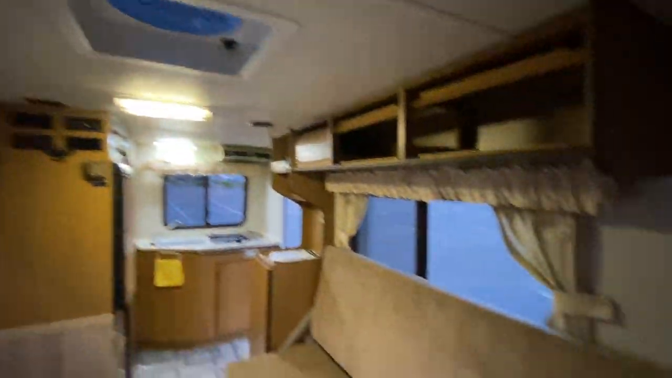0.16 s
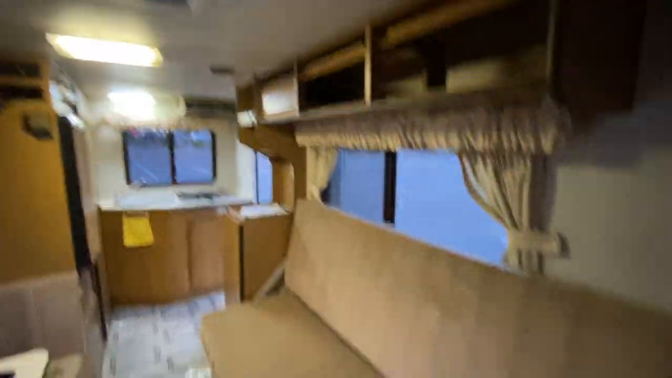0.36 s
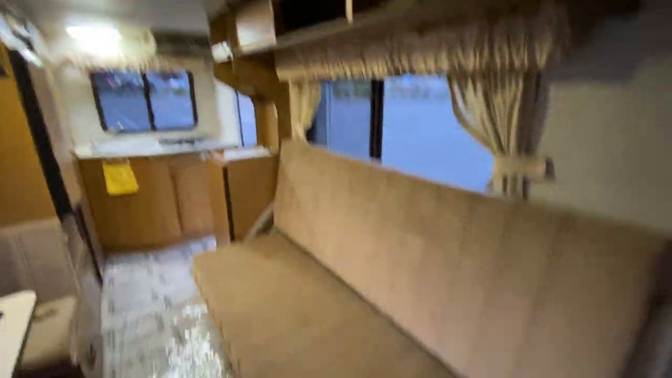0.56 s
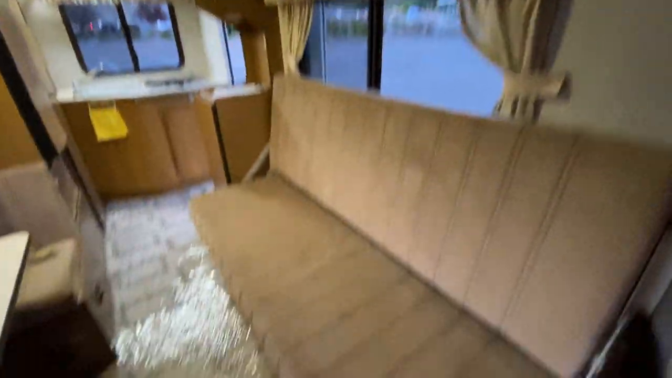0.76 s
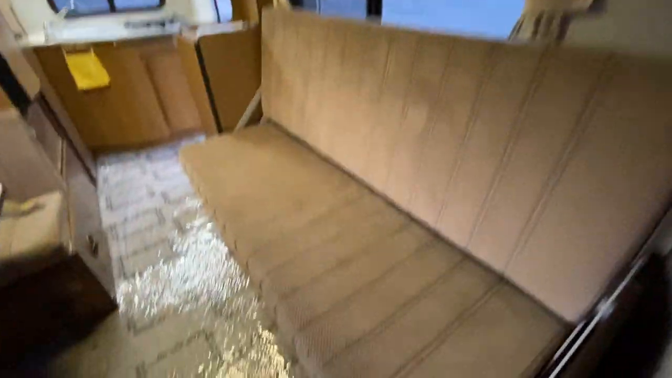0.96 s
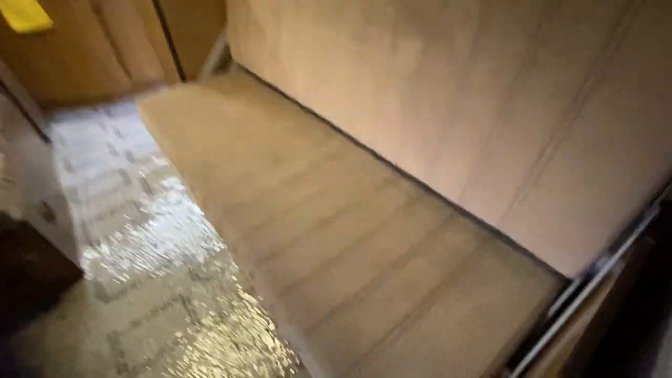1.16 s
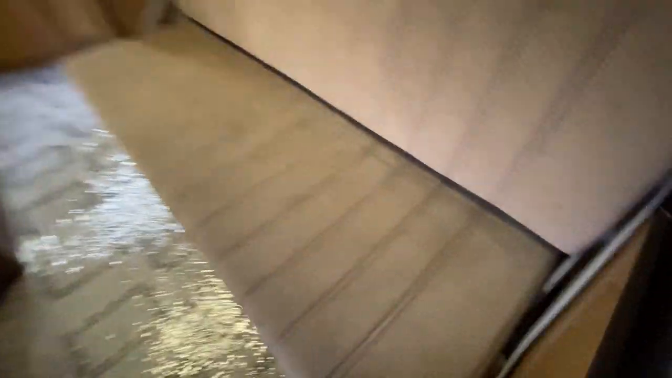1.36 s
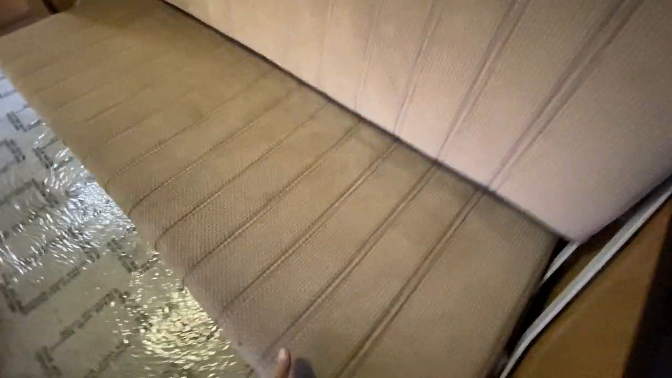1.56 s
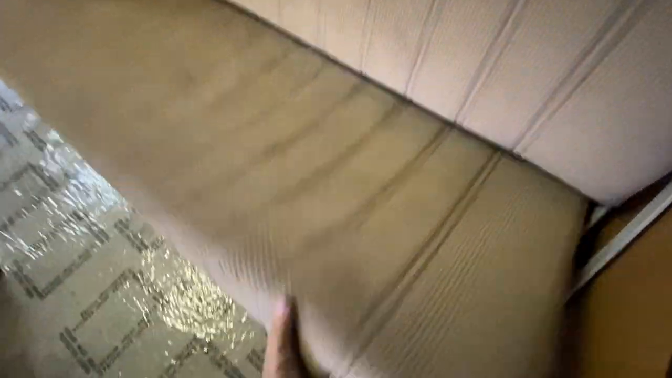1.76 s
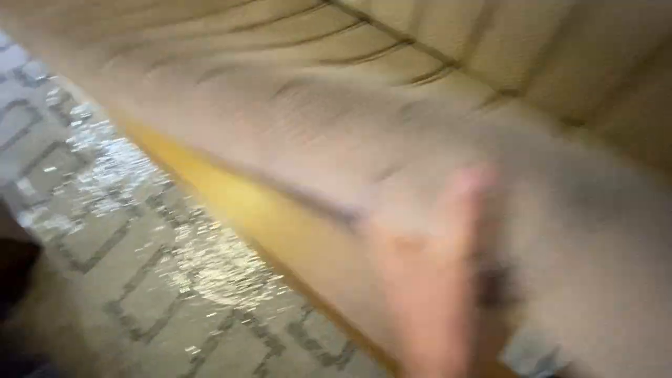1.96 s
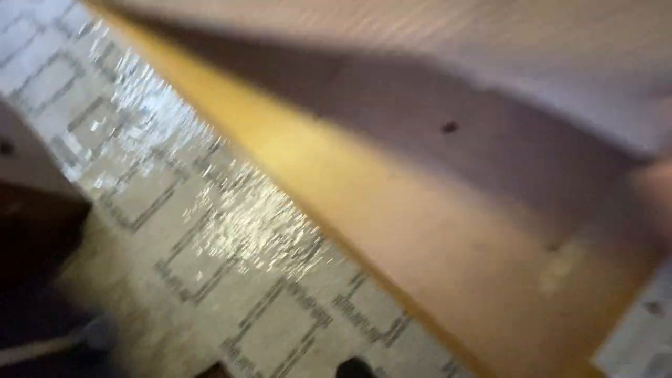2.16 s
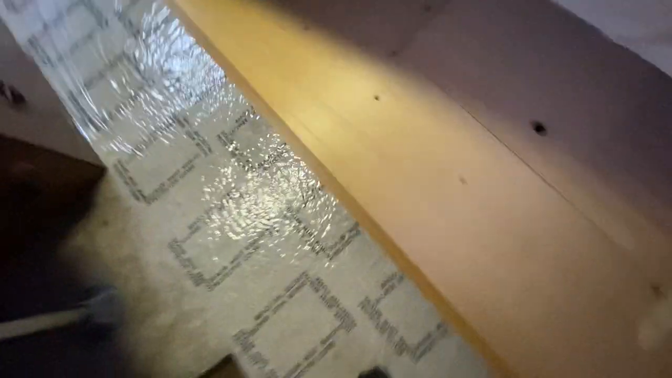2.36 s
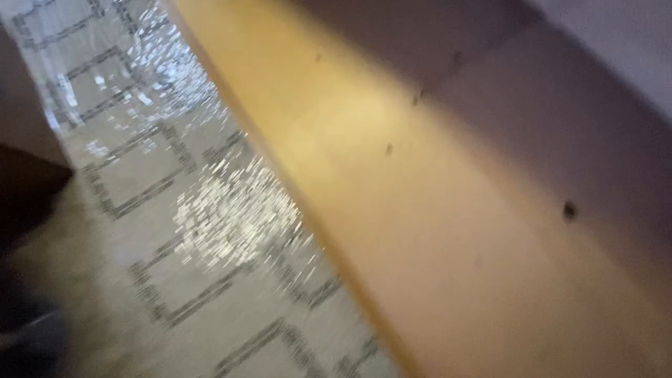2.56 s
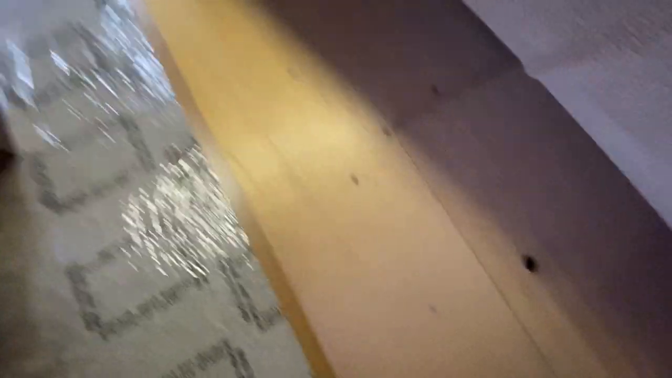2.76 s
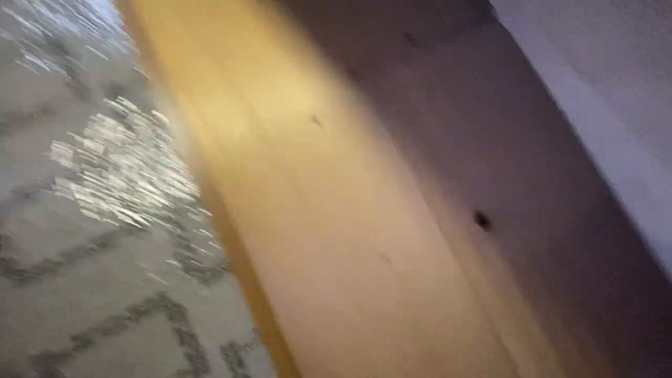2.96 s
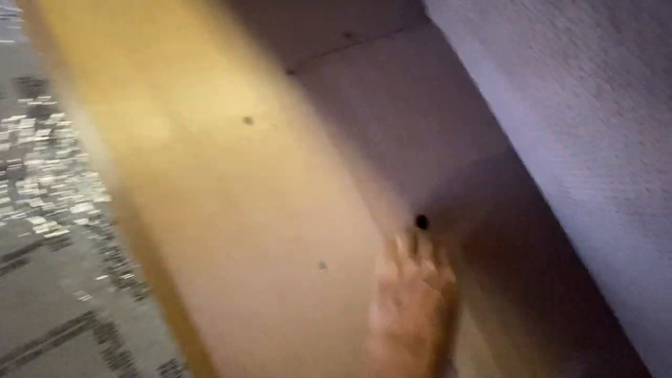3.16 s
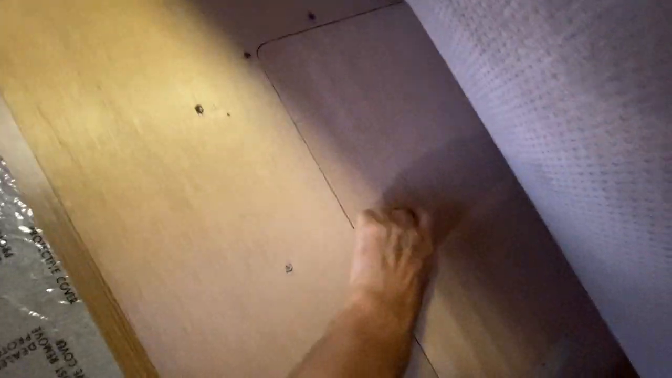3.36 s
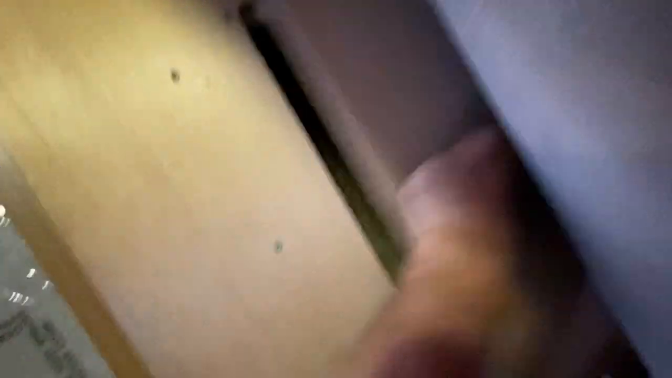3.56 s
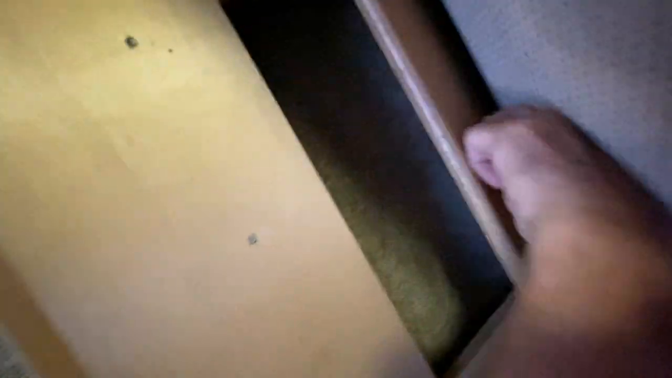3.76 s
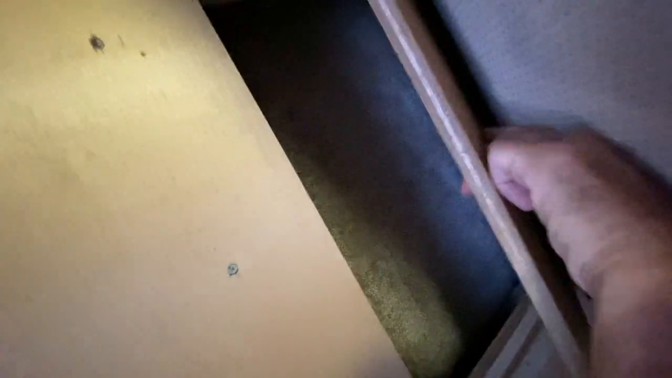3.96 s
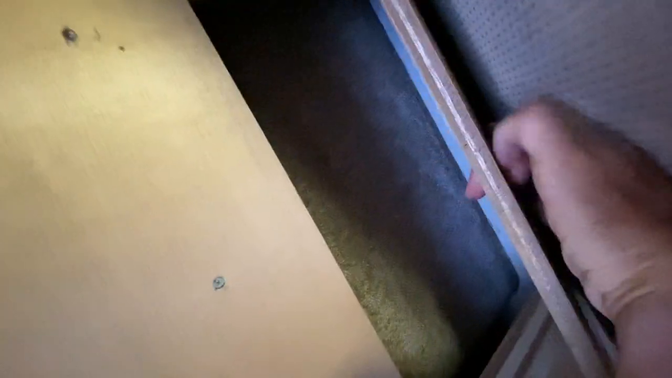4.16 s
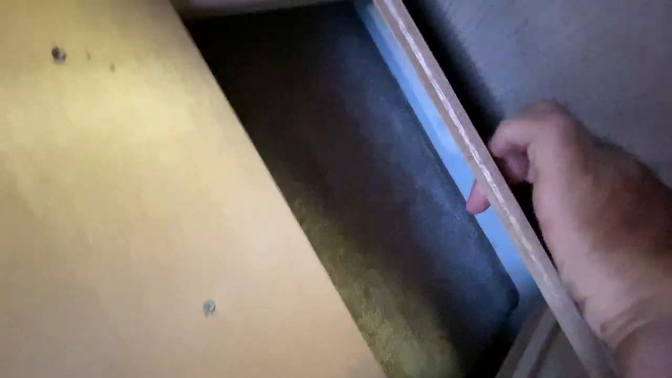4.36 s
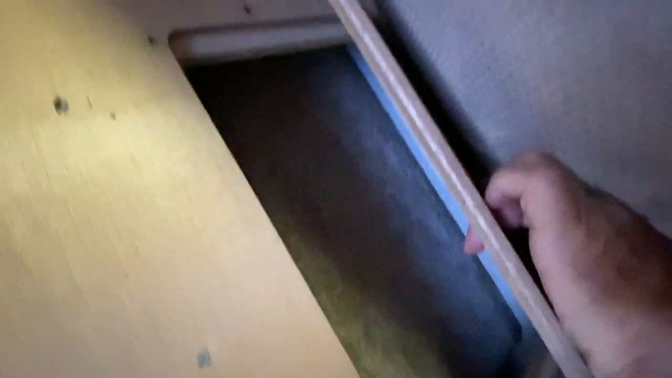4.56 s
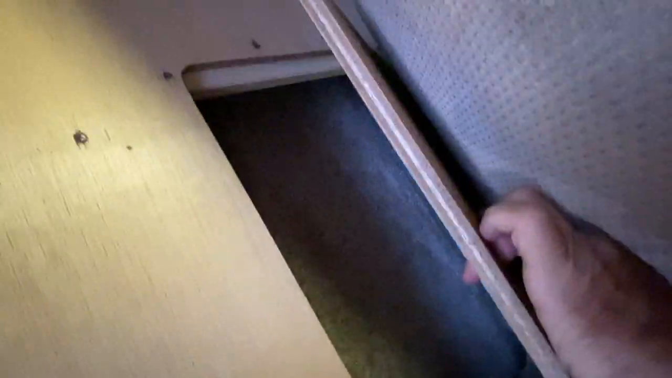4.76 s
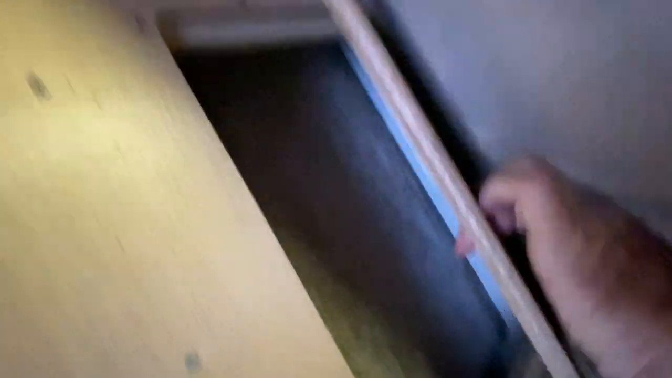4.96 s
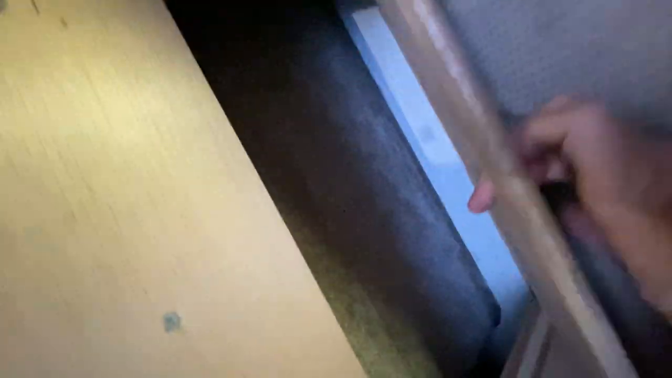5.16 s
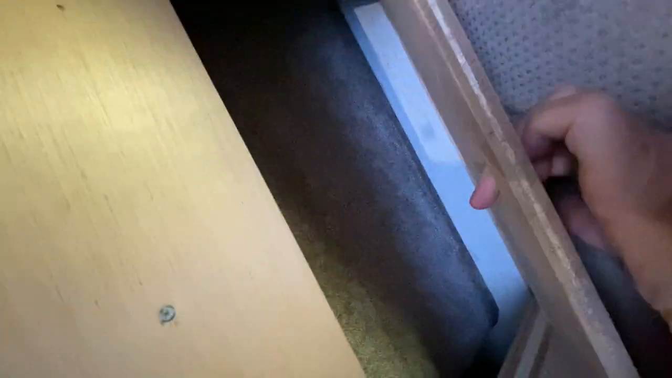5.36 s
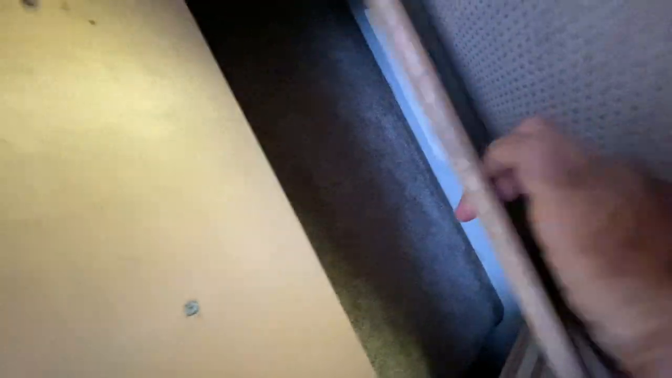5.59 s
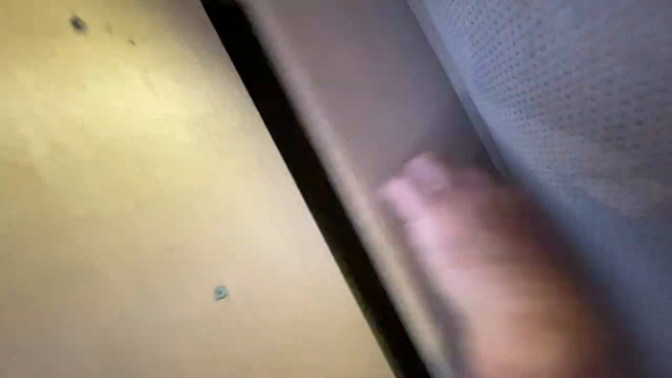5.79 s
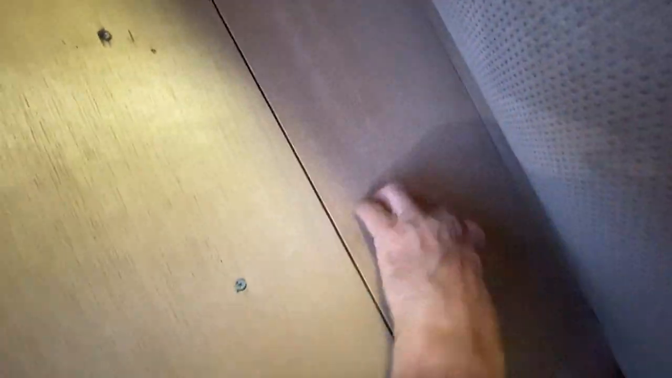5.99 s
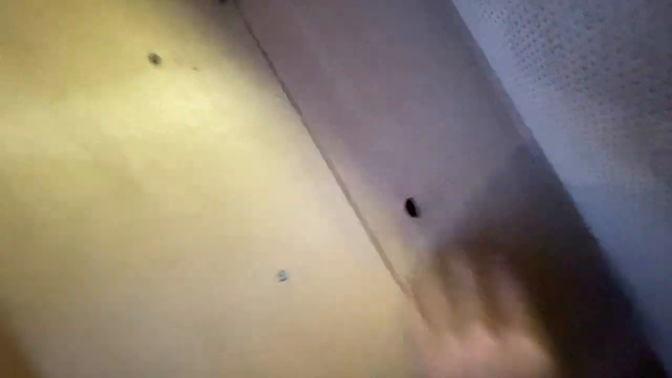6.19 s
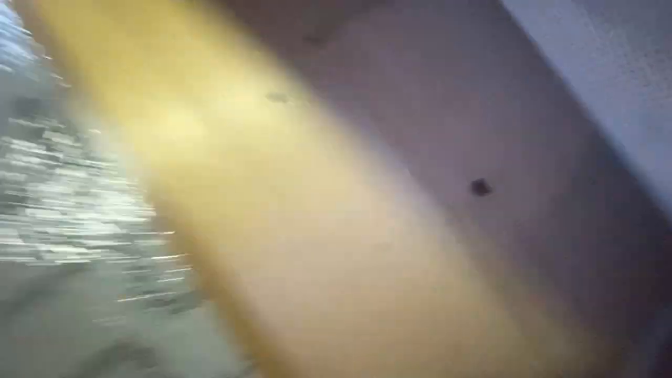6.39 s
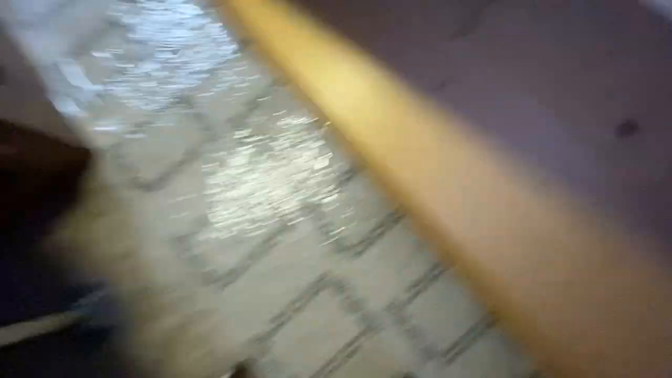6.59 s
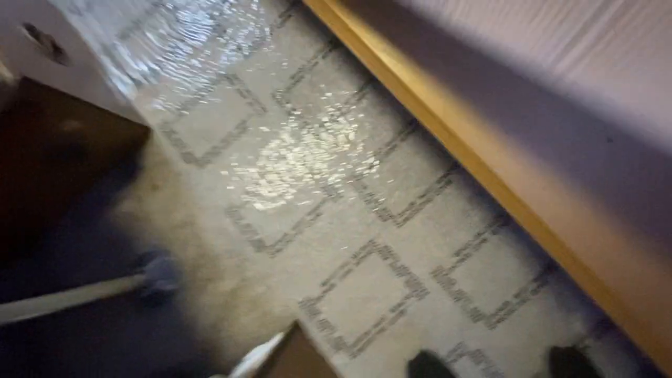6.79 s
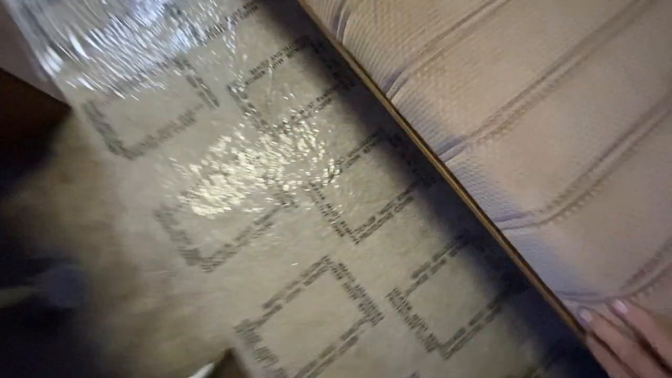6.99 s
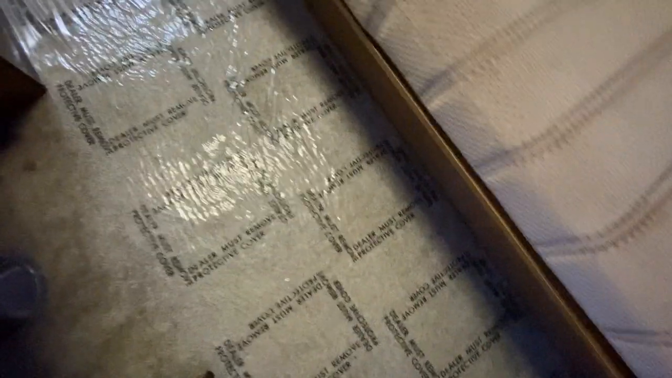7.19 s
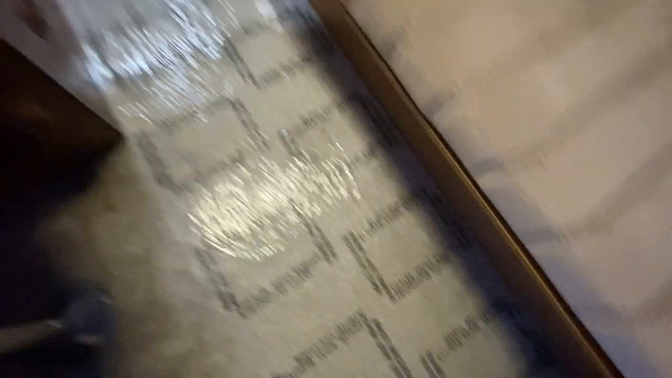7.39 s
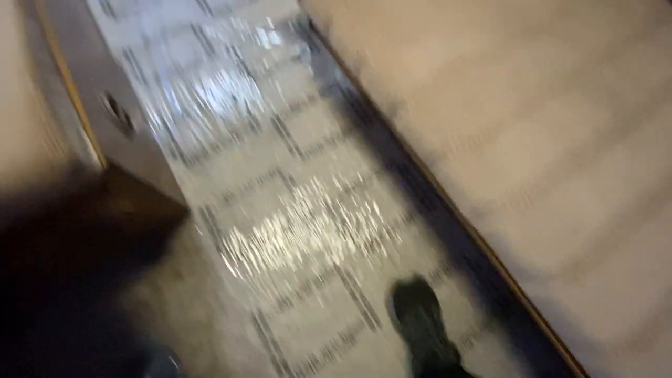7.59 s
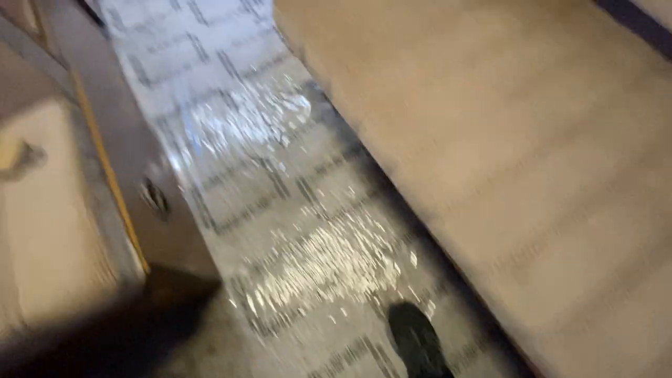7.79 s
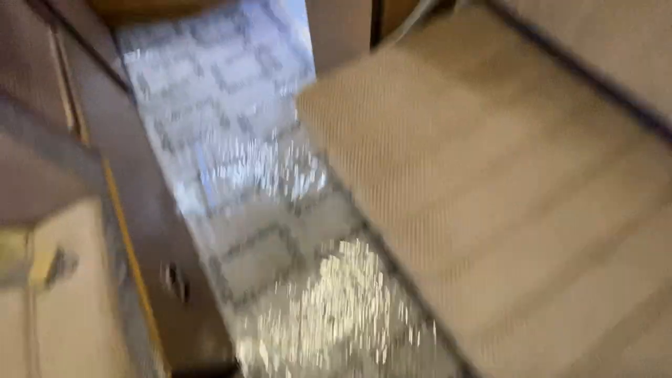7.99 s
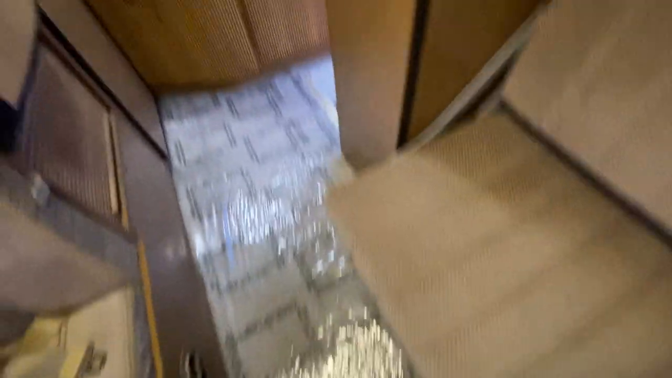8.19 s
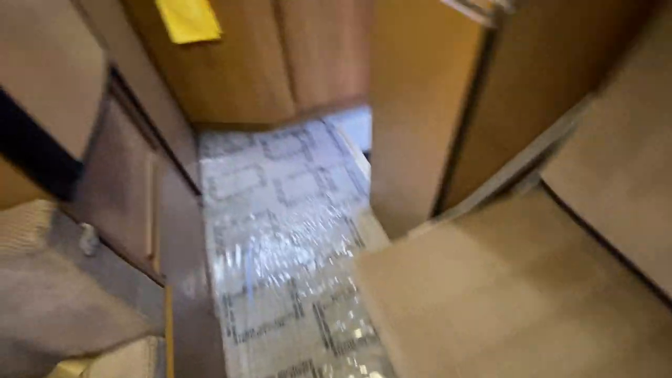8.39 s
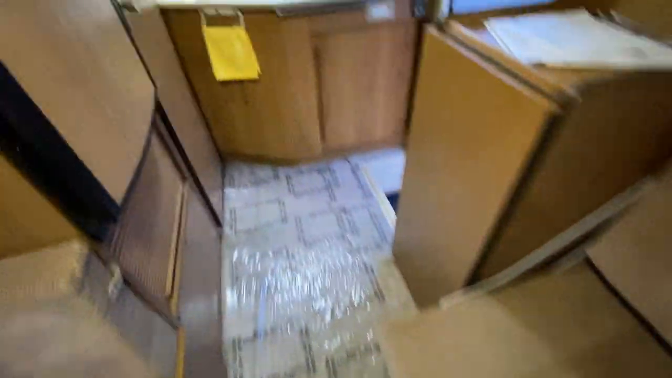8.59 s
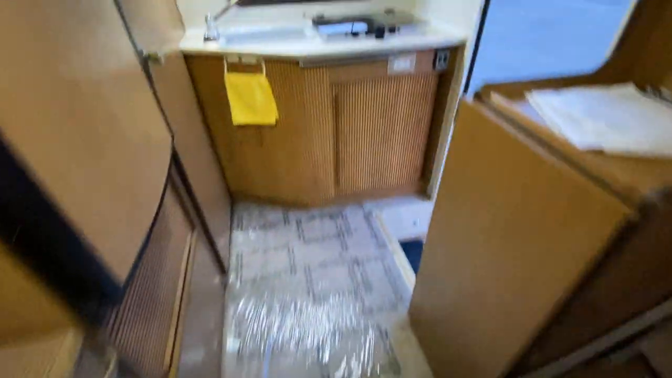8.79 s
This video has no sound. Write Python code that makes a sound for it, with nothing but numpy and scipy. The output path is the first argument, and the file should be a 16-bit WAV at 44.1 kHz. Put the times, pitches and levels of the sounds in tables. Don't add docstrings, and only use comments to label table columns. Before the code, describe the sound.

Close handheld stereo pickup inside a small camper with low outside rumble. A seat cushion is tugged with sharp, raspy fabric scrapes and board knocks, then clothing rustles. A hand lands on wood and jerks a lid free with a cluster of hollow thumps. It is held open with tiny dry creaks, then drops with a loud bouncing slam, followed by soft footfalls and rustling.

```python
import sys
import numpy as np
from scipy import signal
from scipy.fft import rfft, irfft, next_fast_len
from scipy.io import wavfile
from scipy.ndimage import uniform_filter1d

SR = 44100
rng = np.random.default_rng(int(sys.argv[2]) if len(sys.argv) > 2 else 0)


def volts(x):
    e = np.asarray(x, float) / 20
    return 10 ** e


def wav_out(sig):
    wavfile.write(sys.argv[1], SR, np.round(np.clip(np.atleast_2d(sig).T, -1, 1) * 32767).astype(np.int16))


N = 389844


def evened(x):
    return x / np.sqrt(np.mean(x ** 2) + 1e-20)


def read(points, hz):
    f, value = np.transpose(points)
    return np.interp(np.log(hz + 1), np.log(f + 1), value)


def colour(x, points):
    size = x.shape[-1]
    gain = volts(read(points, np.fft.rfftfreq(size, 1 / SR)))
    return evened(irfft(rfft(x) * gain, size))


def curve(tables, column=1):
    rows = np.concatenate(tables)
    return np.interp(np.arange(N) / SR, rows[:, 0], rows[:, column])


def add(mix, s, sound):
    part = mix[round(s * SR):][:len(sound)]
    part += sound[:len(part)]


def wobble(size):
    return evened(uniform_filter1d(uniform_filter1d(rng.standard_normal(N), size), size))


def resonated(x, hz, width_hz):
    band = signal.iirpeak(hz, hz / width_hz, SR)
    return evened(signal.lfilter(*band, signal.lfilter(*band, x)))


def fibres(per_s, spread_db, channels=3):
    size = volts(spread_db * np.minimum(rng.exponential(1, N), 5)) * (rng.random(N) < per_s / SR)
    return size * rng.standard_normal((channels, N))


# time_s, level_db
TRAFFIC = [(0.0, -49), (0.69, -52), (0.93, -46.5), (1.4, -52), (2.2, -41.5), (2.9, -48.5), (4.2, -46.5),
           (4.9, -48.5), (5.19, -47), (5.46, -46.5), (6.72, -43.5), (7.19, -46), (7.83, -47.5),
           (8.84, -48.5)]


def unrest():
    power, t = volts(2 * curve([TRAFFIC])), np.arange(SR) / SR
    shake_db, rise_s, t60_s = -17, 0.017, 0.65
    for s, peak_db, *_ in struck():
        add(power, s, (1 - np.exp(-t / rise_s)) * volts(2 * (peak_db + shake_db - 60 * t / t60_s)))
    return np.sqrt(power)


# pitch_hz, level_db (per Hz)
RUMBLE = [(13, -56.5), (22, -9), (45, -3), (72, 5), (85, -2), (103, -1.5), (177, -10), (221, -15.5),
          (258, -19), (400, -41.5), (520, -77.5), (880, -120)]
# pitch_hz, level_db (per Hz)
AIR = [(88, -39), (150, -1.5), (349, -10.5), (810, -7), (1010, -14.5), (1310, -13), (2530, -34.5),
       (4630, -38.5), (10200, -45), (12000, -59), (15600, -74.5), (22000, -120)]


def background():
    drone = signal.lfilter(*signal.iirpeak(72, 7, SR), rng.standard_normal((3, N)))
    rumble = colour(rng.standard_normal((3, N)), RUMBLE) + volts(-3.5) * colour(drone, RUMBLE)
    rumble = evened(rumble * volts(0.7 * wobble(size=2500)))
    air = colour(rng.standard_normal((3, N)), AIR) * volts(1.6 * wobble(size=4000))
    return unrest() * rumble + volts(-56.5) * air


# time_s, level_db
STIR = [(0.0, -116), (0.27, -80), (0.78, -86), (0.92, -64), (1.03, -72), (1.15, -65), (1.51, -65.5),
        (1.62, -59), (1.88, -55), (2.43, -51.5), (2.71, -65), (3.66, -60.5), (3.8, -66), (4.65, -80),
        (5.43, -105), (5.8, -67), (6.24, -70.5), (8.84, -72)]
# start_s, grip_s, pull_s, first_level_db, last_level_db
DRAGS = [
    (0.926, .004, 0.013, -49.5, -49.5),
    (1.681, 0.029, 0.07, -26, -27),
    (1.929, 0.04, 0.08, -39.5, -34),
    (2.139, 0.0043, 0.051, -38, -41.5),
    (2.257, 0.0075, 0.11, -45.5, -30.5),
    (3.466, 0.0059, 0.053, -53.5, -50),
]
# peak_s, rise_s, fall_s, level_db, dullness_db
RUSTLES = [(0.458, 0.21, 0.45, -67, -2), (2.15, .012, 0.092, -39.5, 8), (2.262, .005, 0.05, -40.5, 0),
           (2.78, 0.037, 0.23, -59.5, 3), (2.92, 0.19, 0.25, -53.5, -7.5), (3.2, 0.13, 0.63, -55.5, -4),
           (5.13, 0.22, 0.15, -69.5, 3), (5.645, 0.15, 0.1, -60.5, 1.5), (5.87, 0.048, 0.16, -66, 20),
           (6.16, .11, 0.09, -52, -9.5), (6.45, 0.16, 0.3, -58.5, 4), (6.7, 0.43, 0.5, -56, -1),
           (6.97, 0.19, 0.13, -53, 1), (7.3, 1, 0.2, -63.5, -6.5), (7.36, 0.095, 0.75, -59, -1),
           (7.74, 0.16, 0.64, -56.5, -2.5), (8.5, 0.11, 1, -60, -0.5)]


def rubbing():
    grip_db, let_go_db_per_s = -22.5, 401.5
    edge_db = -20.5
    t, power, dull = np.arange(N) / SR, volts(2 * curve([STIR])), np.zeros(N)
    for s, grip, pull, first_db, last_db in DRAGS:
        db = np.interp(t - s, [0, grip, grip + pull], [first_db + grip_db, first_db, last_db], left=-200)
        power = power + volts(2 * (db - let_go_db_per_s * np.maximum(t - s - grip - pull, 0)))
    for s, rise, fall, db, dull_db in RUSTLES:
        one = volts(2 * (db + edge_db * np.maximum((s - t) / rise, (t - s) / fall)))
        power, dull = power + one, dull + dull_db * one
    return 10 * np.log10(power), dull / power


def patchy(x, patch_db):
    z = signal.stft(x, nperseg=256)[2]
    patches = rng.standard_normal(z.shape[:0:-1]).T
    patches = evened(uniform_filter1d(uniform_filter1d(patches, size=7, axis=0), size=14, axis=1))
    return signal.istft(z * volts(patch_db * patches), nperseg=256)[1][:, :N]


# pitch_hz, level_db (per Hz)
FIZZ = [(2500, -11.5), (4100, -3), (5200, -2), (6600, -4), (8200, -3.5), (12000, -10.5), (15500, -20),
        (16500, -12.5)]
# pitch_hz, level_db (per Hz)
RASP = [(1000, -42), (1700, 0), (2700, -2), (4000, -9.5), (6000, -20.5)]
# pitch_hz, level_db (per Hz)
SCRAPE = [(70, -48), (130, -0.5), (300, 1), (600, -3), (1000, -3), (1600, -9.5), (2600, -53.5)]


def cloth():
    rub_db, dull_db = rubbing()
    body_db = -3 + dull_db - 0.27 * (rub_db + 35)
    rasp_db = -5.5 + dull_db - 0.18 * (rub_db + 35)
    force = np.clip((rub_db + 65) / 30, .35, 1)
    clumps = volts(force * (1.6 * wobble(size=120) + .9 * wobble(size=900)))
    fizz = volts(rub_db + .8) * colour(fibres(7000, 2.4), FIZZ)
    rasp = volts(rub_db + np.minimum(rasp_db, 9.5) + 2.0) * colour(fibres(5000, 1.0), RASP)
    scrape = volts(rub_db + np.minimum(body_db, 16.5) + 3.0) * colour(fibres(4000, 1.8), SCRAPE)
    weave_hz, width_hz = 6400, 1200
    weave = signal.lfilter(*signal.iirpeak(weave_hz, weave_hz / width_hz, SR), fibres(5500, 2.2))
    weave = volts(rub_db + 0.5 + 0.34 * (rub_db + 23.5)) * evened(weave)
    return patchy(clumps * (fizz + rasp + scrape + weave), 1.9)


# pitch_hz, level_db (per Hz)
PUFF = [(700, -6.5), (1500, 3), (4000, -4), (8000, -16), (14000, -34)]


def dry_slips(rows):
    out, t = np.zeros(N), np.arange(SR // 10) / SR
    for s, peak_db, hz, fizz_db in rows:
        ring = np.sin(2 * np.pi * hz * t) + 0.29 * np.sin(2 * np.pi * 1.5 * hz * t)
        puff = colour(rng.standard_normal(len(t)), PUFF) * volts(fizz_db + 4.0 - 60 * t / 0.076)
        add(out, s, volts(peak_db - 2.0) * (ring * volts(-60 * t / 0.022) + puff))
    return out


# start_s, peak_db, pitch_hz, fizz_db (relative)
TICKS = [(0.2838, -50, 1150, -41), (0.473, -37, 1150, -32), (0.9342, -26, 1310, -13.5),
         (1.2116, -48.5, 1120, -7), (3.5247, -28.5, 1910, -10.5), (3.8223, -44, 933, -15),
         (4.0547, -59, 1130, -1), (4.109, -48, 2230, -7), (4.1608, -47, 990, -6), (5.118, -46.5, 2060, -2),
         (5.6411, -38, 2200, -14), (7.3412, -52, 1090, -3), (7.642, -38, 870, -28), (7.717, -32, 1050, -16),
         (8.077, -55, 3020, -16), (8.533, -40, 640, -12), (8.6118, -43, 3340, -27), (8.715, -38, 1700, -11)]


def ticks():
    return dry_slips(TICKS)


# start_s, length_s, level_db, pitch_hz, width_hz
SWELLS = [
    (2.76, 0.23, -52.5, 2200, 1700),
    (3.12, 0.43, -57.5, 9200, 2000),
    (7.9, 1, -60.5, 910, 150),
    (0.6, 1, -72, 4520, 720),
]


def swells():
    out = np.zeros((3, N))
    for s, length, db, hz, width_hz in SWELLS:
        gate = np.zeros(N)
        add(gate, s, signal.windows.tukey(round(length * SR), .5))
        out += volts(db) * gate * resonated(fibres(7400, 0.9), hz, width_hz)
    return out


# start_s, peak_db, boom_hz, knock_db (relative)
STEPS = [(0.879, -37.5, 112, -2), (0.951, -20.5, 48, -19.5), (1.211, -32.5, 64, -12),
         (2.847, -33, 57.4, -11), (4.152, -39, 81.4, -26), (5.119, -30, 119, -14.5),
         (6.496, -29, 195, -28.5), (6.917, -20.5, 118, -24), (7.008, -26, 102, -21), (7.45, -42, 69.6, -26),
         (7.69, -38, 71.4, -3.5), (7.717, -27, 56, -11.5), (7.74, -29, 62, -9), (8.075, -41, 65.2, -34),
         (8.393, -31, 50, -23), (8.519, -39, 55, -4)]
# start_s, peak_db, boom_hz, knock_db (relative), knock_hz
BUMPS = [
    (1.712, -19, 296, 2, 520),
    (1.746, -15.5, 157, -8.5, 511),
    (1.782, -13.5, 190, -25, 517),
    (2.261, -49, 274, -3, 980),
    (2.429, -37.5, 71.7, -7, 1136),
]
LIFT = [(3.169, -21, 81, -22, 895), (3.203, -22, 79, -31, 474), (3.478, -22, 149, -12, 507),
        (3.517, -19, 154.6, -14, 505), (3.562, -13.5, 150, -21, 430), (3.62, -28, 51.5, -4.5, 1180),
        (3.644, -23, 53.8, -8, 750), (3.672, -24, 150, -22, 452), (3.69, -12, 133, -41, 476),
        (3.717, -26.5, 116.3, 0.5, 470), (3.737, -22, 320, 7, 1150), (3.742, -15, 274, -14, 700),
        (3.779, -10.5, 147, -24.5, 454)]
DROP = [
    (5.662, -20, 262, -14, 620),
    (5.672, -12, 112, -30, 800),
    (5.889, -6, 272, 0.5, 1050),
    (5.895, -5, 137, -8, 700),
    (5.904, -6.5, 94, -6, 1700),
    (5.914, -10.5, 121, -0.5, 730),
    (5.93, -18.5, 99.8, 3, 1470),
    (5.945, -14.5, 232, -17, 512),
    (5.985, -33, 150, -33, 500),
]


def struck():
    steps = [(*row, 656, -53) for row in STEPS]
    bumps = [(*row, -56) for row in BUMPS]
    lift = [(*row, -41.5) for row in LIFT]
    drop = [(*row, -43) for row in DROP]
    return sorted(steps + bumps + lift + drop)


def near(hz, centre_hz, octaves):
    return volts(-6 * (np.log2(hz / centre_hz) / octaves) ** 2)


# pitch_hz, level_db (per Hz)
CRACK = [(800, -22.5), (1500, 4.5), (2800, 5), (3900, -3), (5200, 0), (8000, -9.5), (12000, -35),
         (16000, -45.5)]


def snap(t):
    return colour(rng.standard_normal(len(t)), CRACK) * (volts(-60 * t / .013) + volts(-13 - 60 * t / .09))


# pitch_hz, level_db, t60_s
BENCH = [(52.6, -1.5, 0.42), (72, 1.5, 0.29), (96.1, 1, 0.26), (116.9, 2, 0.14), (155, -0.5, 0.21),
         (185, -3.5, 0.2), (221.8, 2.5, 0.16), (265.6, 0, 0.13), (296, -1, 0.08), (328, -10.5, 0.18),
         (394.6, 4, 0.054)]


def boom(t, boom_hz):
    hz, db, t60 = np.transpose(BENCH)[:, :, None]
    spot = rng.standard_normal((3, len(hz), 1))
    swell = near(hz, boom_hz, 0.97) * (1 - np.exp(-t * hz / 0.66))
    swell = swell * (0.5 + volts(-60 * t / .12))
    swing = np.sin(2 * np.pi * hz * (1 + 0.035 * spot[1]) * t + 0.73 * spot[2])
    out = (volts(db + 3.1 * spot[0] - 60 * t / t60) * swell * swing).sum(0)
    return out / abs(out).max()


def knock(t, knock_hz):
    ladder = np.geomspace(400, 4500, 36)[:, None]
    spot = rng.standard_normal((3, len(ladder), 1))
    high = ladder * (1 + 0.031 * spot[1])
    fade_db = -60 * t / (0.063 * (1000 / high) ** 1.1)
    rise = (1 - np.exp(-high * t / .6)) ** 2
    favour = near(high, knock_hz, np.sqrt(knock_hz / 1000))
    swing = np.sin(2 * np.pi * high * t + 1.41 * spot[2])
    out = (volts(0.98 * spot[0] + fade_db) * favour * rise * swing).sum(0)
    return out / abs(out).max()


def blows():
    out, t = np.zeros(N), np.arange(SR // 3) / SR
    for s, peak_db, boom_hz, knock_db, knock_hz, crack_db in struck():
        add(out, s, volts(peak_db - 1.0) * boom(t, boom_hz) + volts(crack_db - 7.5) * snap(t))
        add(out, s, volts(peak_db + knock_db + 2.5) * knock(t[:SR // 6], knock_hz))
    return out


def rings(rows):
    out, t = np.zeros(N), np.arange(SR // 4) / SR
    for s, peak_db, hz, t60 in rows:
        pair = np.sin(2 * np.pi * hz * t) + volts(-8) * np.sin(2 * np.pi * hz * 1.045 * t)
        add(out, s, volts(peak_db + 2.5 - 60 * t / t60) * (1 - np.exp(-t * hz / 0.87)) * pair)
    return out


# start_s, peak_db, pitch_hz, t60_s
PANEL_MODES = [(1.711, -18.5, 1450, 0.05), (1.709, -19, 560, .06), (1.733, -19, 520, .05),
               (3.6805, -24, 520, .03), (3.68, -18.5, 414, 0.049), (3.689, -10, 190, .05),
               (3.7, -19, 140, .2), (3.7365, -15.5, 1375, 0.022), (3.7365, -24, 2210, 0.042),
               (3.737, -36, 3300, .025), (7.7, -31, 72, .45), (8.375, -35, 68, .4), (7.44, -38, 72, .4),
               (0.945, -26, 44, .5), (5.67, -20, 80, .3), (3.645, -40, 4300, .03), (3.646, -42, 3000, .025),
               (3.663, -42, 2150, .02), (3.741, -6, 315, .06), (3.745, -24, 995, .1),
               (3.749, -24, 770, 0.1), (3.748, -31.5, 1706, 0.035), (3.78, -43.5, 2190, 0.033),
               (5.638, -35, 272, .15), (5.6625, -8, 600, .03), (5.662, -33, 1220, .025),
               (5.6715, -5.5, 250, .05), (5.675, -19, 135, .2), (5.6765, -26, 640, .03),
               (5.688, -32, 560, .05), (5.6395, -40, 2180, .04), (5.664, -14, 340, .04),
               (5.672, -19.5, 458, 0.042), (5.888, -9, 796, 0.032), (5.898, -15.5, 711, 0.17),
               (5.903, -18, 1217, .07), (5.893, -12, 560, .06), (5.92, -14, 500, .08),
               (5.908, -17, 125, .4), (5.901, -15, 2113, 0.1), (5.905, -21, 2960, 0.046),
               (5.9145, -16, 4610, .018), (5.912, -8, 280, 0.093), (5.929, -18.5, 1472, 0.06),
               (5.936, -21.5, 996, 0.05), (6.9135, -32, 700, 0.042), (6.925, -30, 410, 0.038)]


def panel_rings():
    return rings(PANEL_MODES)


# start_s, length_s, level_db, from_hz, to_hz
SQUEAK = (1.372, .06, -55, 1750, 2150)


def squeak():
    s, length, db, from_hz, to_hz = SQUEAK
    out, size = np.zeros(N), round(length * SR)
    hz = np.linspace(from_hz, to_hz, size) + 130 * wobble(size=40)[:size]
    level = volts(db + 5.4 * wobble(size=90)[:size]) * signal.windows.tukey(size, .3)
    add(out, s, level * np.sin(2 * np.pi * np.cumsum(hz) / SR))
    return out


# start_s, peak_db, pitch_hz, t60_s
JERKS = [(1.7225, -12.5, 6700, .02), (1.7225, -19, 4600, .012), (1.747, -16.5, 6450, .03),
         (1.749, -21, 5300, .02), (1.766, -19, 6700, 0.045), (1.768, -25, 5200, .02),
         (1.697, -29, 6000, .04), (1.973, -36, 5200, .04), (2.01, -35, 7000, .03),
         (2.345, -30, 6300, 0.049)]


def weave_jerks():
    return 0.52 * rings(JERKS)


# start_s, length_s, level_db, pitch_hz, width_hz
BRUSHES = [(2.14, .055, -39.5, 1500, 1500), (1.87, .09, -50, 1000, 900), (2.075, .04, -48, 1400, 1200),
           (3.03, .3, -58, 950, 200), (3.3, .07, -54, 500, 160), (3.33, .07, -50, 250, 120),
           (4.14, .2, -61, 1100, 700), (2.3, .25, -45, 150, 90), (5.876, .016, -37, 1400, 900),
           (3.755, .04, -52, 2200, 800), (5.93, .03, -28, 900, 500), (7.72, .06, -47, 300, 150),
           (8.52, .035, -55, 1100, 1300), (8.1, .4, -60, 880, 120), (2.195, .03, -44, 6500, 2500),
           (2.15, .04, -42, 3000, 2000), (2.865, .05, -50, 2400, 700), (2.755, .03, -60, 8000, 3000),
           (4.42, .33, -70, 3000, 3000), (4.93, .38, -69, 3200, 3000), (1.72, .07, -33, 4800, 1500),
           (5.895, .02, -30, 2800, 1800), (5.93, .02, -31, 2600, 1800), (7.03, .45, -60, 860, 140),
           (5.67, .05, -38, 750, 500), (2.045, .02, -38, 1500, 1500)]


def brushes():
    out = np.zeros((3, N))
    for s, length, db, hz, width_hz in BRUSHES:
        size = round(length * SR)
        hiss = resonated(rng.standard_normal((3, SR // 2)), hz, width_hz)[:, -size:]
        add(out.T, s, (volts(db) * signal.windows.tukey(size, .5) * hiss).T)
    return out


def stick_slip(tables, modes, per_s, spread_db, waver_db):
    snaps = fibres(per_s, spread_db, channels=1)[0]
    sung, gate = np.zeros(N), np.zeros(N)
    for hz, width_hz, db in modes:
        sung += volts(db + waver_db * wobble(size=350)) * resonated(snaps, hz, width_hz)
    for rows in tables:
        length = rows[-1][0] - rows[0][0]
        add(gate, rows[0][0], signal.windows.tukey(round(length * SR), .15))
    return volts(curve(tables)) * gate * sung


# time_s, level_db
SLIDE = [
    [(3.14, -95), (3.206, -58), (3.41, -66), (3.44, -77)],
    [(3.475, -53), (3.558, -52.5), (3.694, -55), (3.73, -39)],
    [(5.45, -85), (5.654, -74), (5.688, -73), (5.87, -53), (5.88, -49)],
    [(6.02, -73), (6.158, -53.5), (6.204, -59), (6.22, -74)],
]
# pitch_hz, width_hz, level_db
GLAZE = [(1240, 200, 1), (2160, 280, -1.5), (3200, 420, -7), (4350, 480, -10), (5050, 300, -11),
         (6230, 420, -16)]


def finger():
    return volts(0.5) * stick_slip(SLIDE, GLAZE, 1200, 2.2, 3.2)


# start_s, peak_db
SLIPS = [(4.192, -48), (4.227, -48), (4.267, -49), (4.443, -47), (4.508, -47), (4.533, -47), (4.571, -46),
         (4.591, -47), (4.685, -49), (4.811, -44), (4.865, -49), (4.914, -46), (4.989, -46), (5.104, -47),
         (5.183, -45), (5.238, -45), (5.276, -50), (5.309, -45)]
# pitch_hz, width_hz, level_db
JOINT = [(690, 420, 0), (1250, 560, -2)]


def joint_slips():
    (low_hz, *_), (high_hz, *_) = JOINT
    t60_s = .018
    low = [(s, db - 4.5, low_hz, t60_s) for s, db in SLIPS]
    high = [(s, db - 5.5, high_hz, t60_s) for s, db in SLIPS]
    return rings(low + high)


# time_s, level_db
HELD = [
    [(4.38, -68), (4.448, -58.5), (4.734, -62.5), (4.772, -94), (4.814, -63), (4.882, -105), (4.93, -57.5),
     (5.326, -64), (5.36, -88)],
]


def held_lid():
    return volts(2.0) * stick_slip(HELD, JOINT, 400, 1.2, 1.2)


# start_s, peak_db
CREAKS = [(4.425, -45), (4.4693, -43.5), (4.6119, -59), (4.6433, -43.5), (4.679, -40), (4.729, -41),
          (4.812, -41), (4.8648, -53), (4.9158, -46), (4.9302, -42), (4.9704, -44), (5.0185, -40),
          (5.0553, -45), (5.1704, -42), (5.2026, -45.5), (5.2385, -51), (5.311, -39.5)]


def creaks():
    return dry_slips([(*row, 1250 * (1 + 0.037 * rng.standard_normal()), -17) for row in CREAKS])


# start_s, crack_db
SLAPS = [
    (5.888, -17),
    (5.902, -24),
    (5.9151, -11.5),
    (5.929, -12.5),
]


def slaps():
    out, t = np.zeros(N), np.arange(SR // 3) / SR
    for s, crack_db in SLAPS:
        add(out, s, volts(crack_db + 2.0) * snap(t))
    return out


# pitch_hz, t60_s
CABIN = [(60, 0.97), (250, 0.049), (1000, 0.088), (4000, 0.062), (12000, 0.024)]


def cabin(x):
    taps = np.zeros((2, SR // 2))
    at = np.arange(60, SR // 2 - 20, 20) + rng.integers(0, 20, (2, (SR // 2 - 61) // 20))
    np.put_along_axis(taps, at, rng.choice([-1., 1.], at.shape), 1)
    f, t, z = signal.stft(taps, SR, nperseg=256)
    z = z * volts(-60 * t / read(CABIN, f)[:, None])
    tail = signal.istft(z / np.sqrt((abs(z) ** 2).sum(2, keepdims=True)), SR, nperseg=256)[1]
    walls = signal.fftconvolve(x[None], tail / np.linalg.norm(tail[0]), axes=1)[:, :N]
    return np.vstack([x, walls])


def ports(x, direct, lead, tilt):
    size = next_fast_len(N + SR // 4)
    hz, side, z = np.fft.rfftfreq(size, 1 / SR), np.array([[.5], [-.5]]), rfft(x, size)
    share = np.clip(read(direct, hz), 0, 1)
    straight = np.sqrt(share) * np.exp(1j * side * np.interp(hz, *np.transpose(lead))) * z[0]
    scattered = np.sqrt(1 - share) * z[1:]
    return irfft((straight + scattered) * volts(side * read(tilt, hz)), size)[:, :N]


# pitch_hz, share (0-1)
DIRECT_CLOTH = [(40, 1), (100, 0.85), (300, 1.0), (1000, 0.09), (4000, 0.54), (9000, -0.1), (15000, 3)]
DIRECT_WOOD = [(40, .75), (120, 0.94), (300, 0.8), (1000, 0.55), (2000, .7), (4000, 0.75), (13300, 1)]
# pitch_hz, lead_radians
LEAD_CLOTH = [(0, 0.5), (950, -3), (1810, -1.5), (5080, -1.5), (5510, 2.7), (11800, -7.5), (14600, -11.5),
              (16400, -13)]
LEAD_WOOD = [(0, 0), (250, .5), (600, 1.9), (1200, 1.5), (16400, 1.6)]
# pitch_hz, left_minus_right_db
TILT_CLOTH = [(60, 0), (180, 0), (550, 2.5), (1650, -2.5), (4970, 4), (15000, -5)]
TILT_WOOD = [(60, -0.5), (180, -3), (300, 1), (550, 3), (1000, -3), (1650, -2), (4970, 3), (15000, 0)]


def scene():
    soft = background() + cloth() + swells() + weave_jerks() + brushes() + joint_slips()
    wood = ticks() + blows() + panel_rings() + squeak() + finger() + held_lid() + creaks() + slaps()
    heard_soft = ports(soft, DIRECT_CLOTH, LEAD_CLOTH, TILT_CLOTH)
    return heard_soft + ports(cabin(wood), DIRECT_WOOD, LEAD_WOOD, TILT_WOOD)


# pitch_hz, level_db
CENTRE = [(12300, 0), (12750, -12), (12900, -45), (13600, -45), (13900, 0)]


def steered(x):
    mid = x.mean(0)
    notch = volts(read(CENTRE, np.fft.rfftfreq(N, 1 / SR)))
    return x - mid + irfft(rfft(mid) * notch, N)


# start_s, length_s, pitch_hz, width_hz
DROPOUT = (1.715, .085, 2950, 460)


def dropout(x):
    s, length, hz, width_hz = DROPOUT
    out, at, size = x.copy(), round(s * SR), round(length * SR)
    lost = rfft(x[:, at:at + size]) * (abs(np.fft.rfftfreq(size, 1 / SR) - hz) < width_hz / 2)
    add(out.T, s, -(signal.windows.tukey(size, .3) * irfft(lost, size)).T)
    return out


def top_cut(x):
    return signal.sosfilt(signal.butter(12, 16790, fs=SR, output="sos"), x)


def record(dry):
    thin = signal.lfilter(*signal.butter(2, 38, "high", fs=SR), dry)
    limited = .95 * np.tanh(thin / .95)
    edge = signal.firwin(511, 15900, window=("kaiser", 9), fs=SR)
    mix = signal.oaconvolve(dropout(steered(limited)), edge[None], "same")
    return top_cut(mix)


dry = scene()
out = record(dry)
wav_out(out)
```